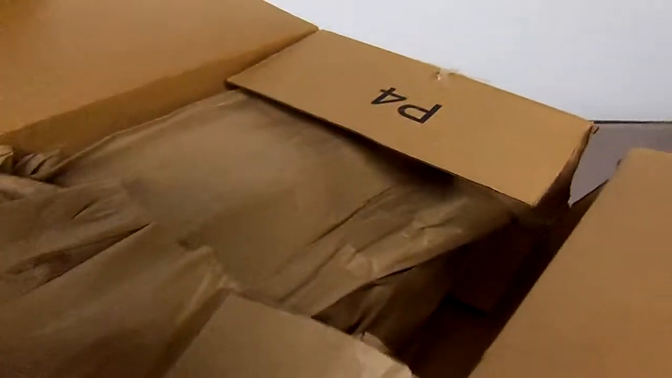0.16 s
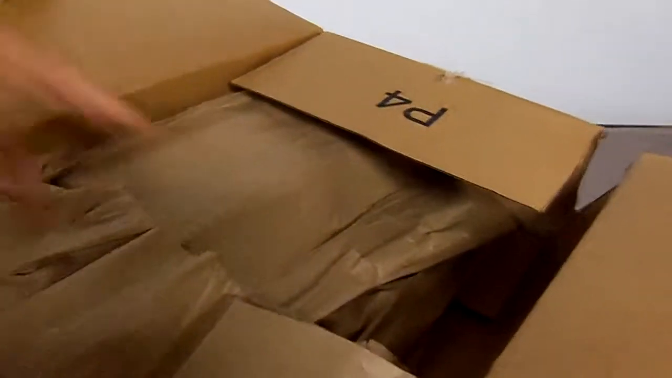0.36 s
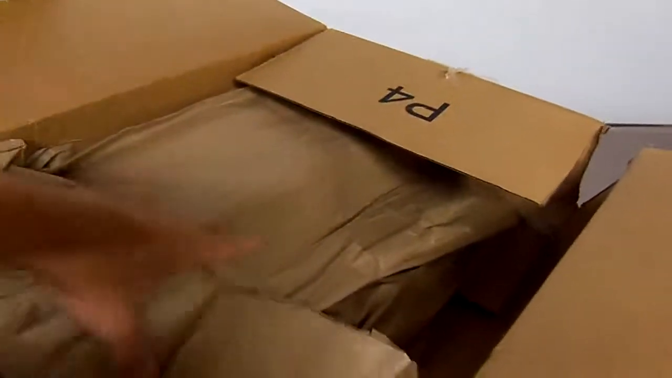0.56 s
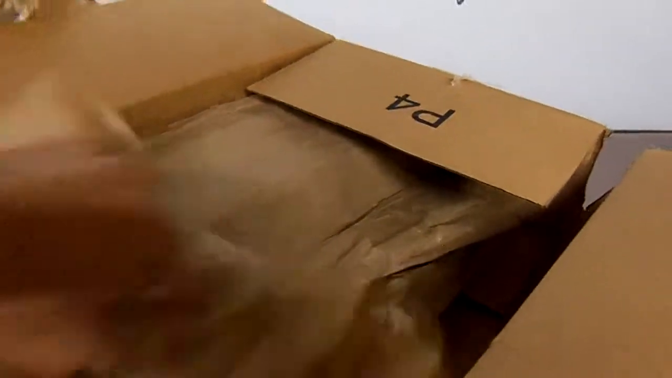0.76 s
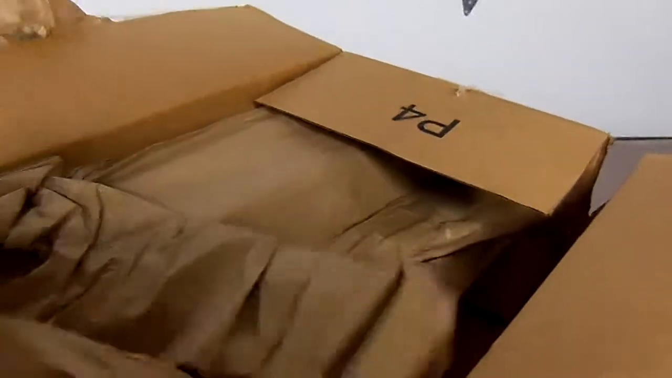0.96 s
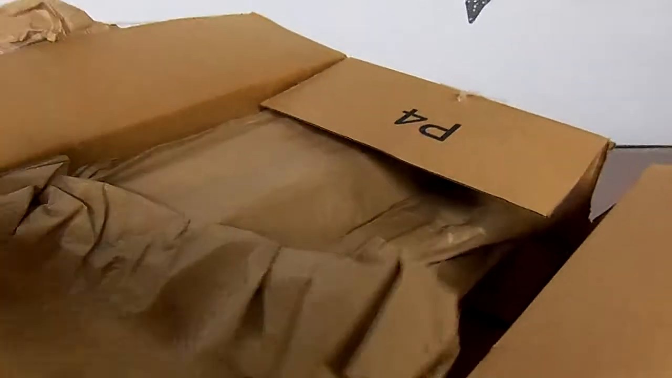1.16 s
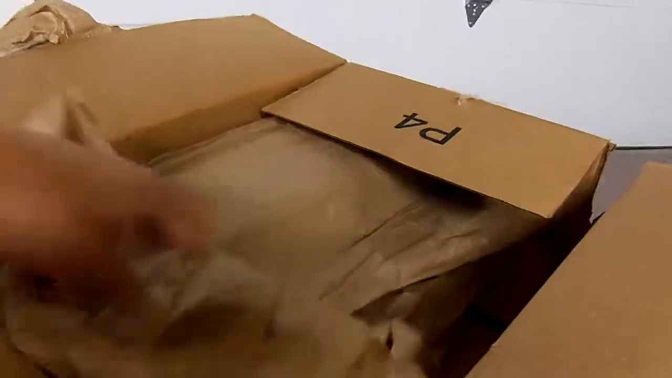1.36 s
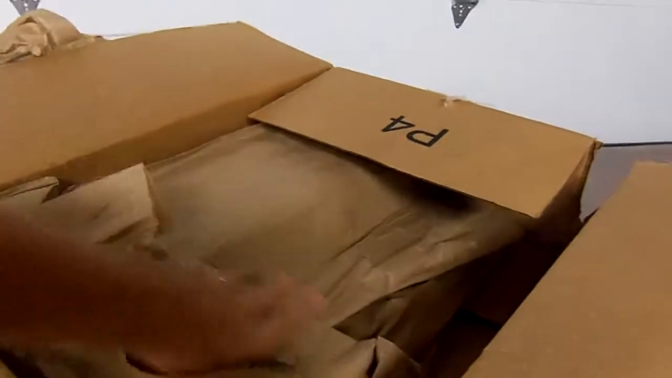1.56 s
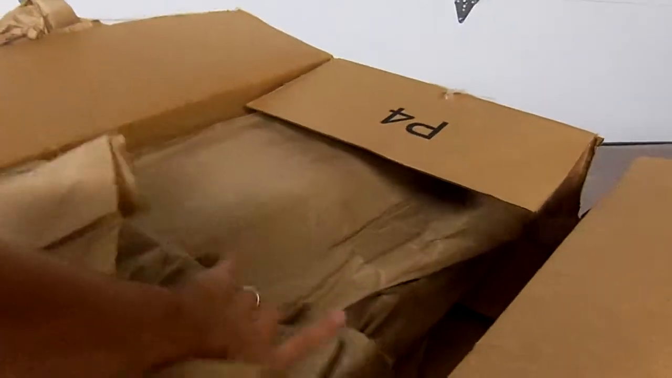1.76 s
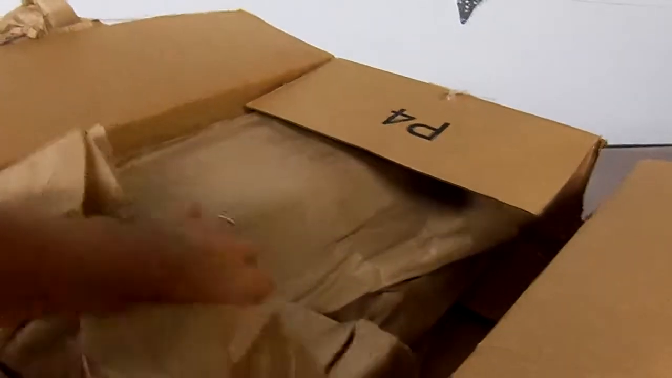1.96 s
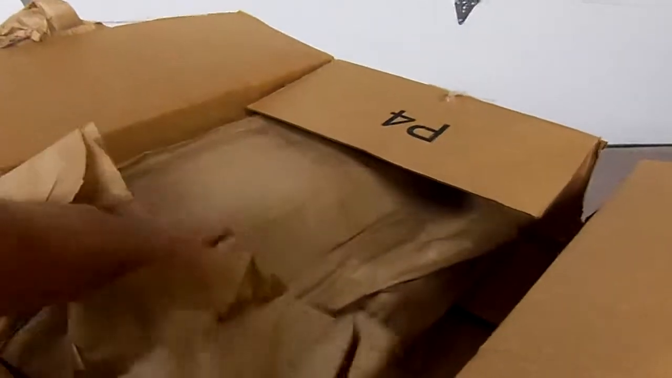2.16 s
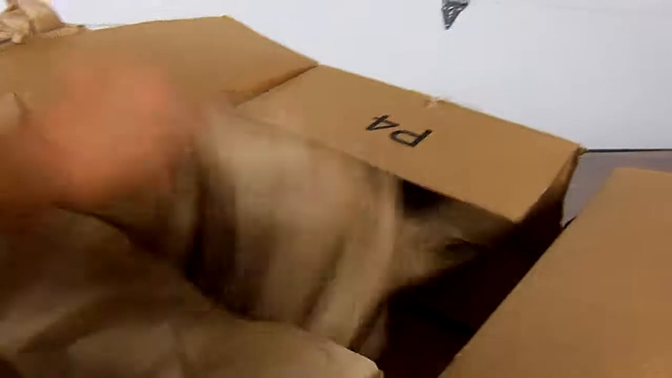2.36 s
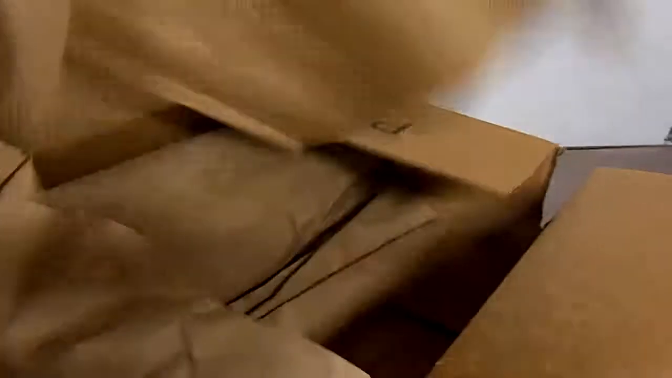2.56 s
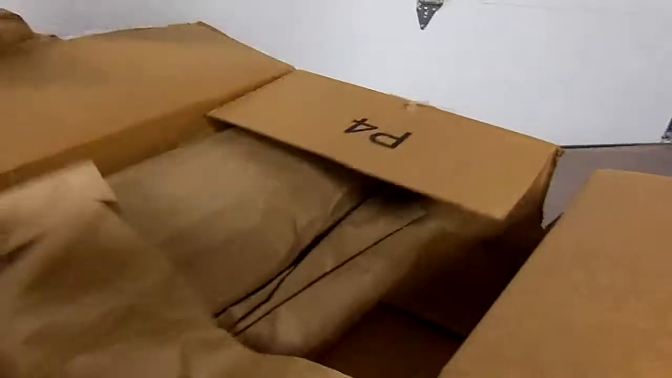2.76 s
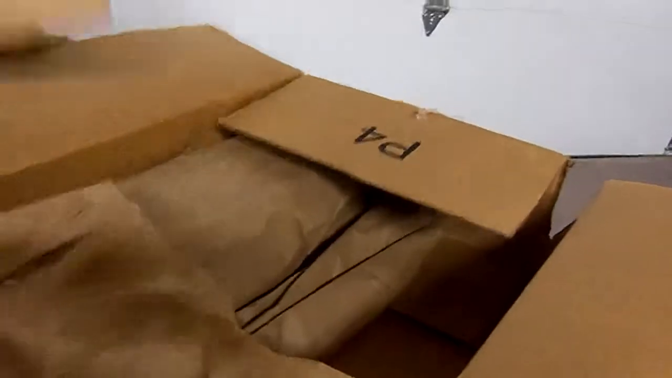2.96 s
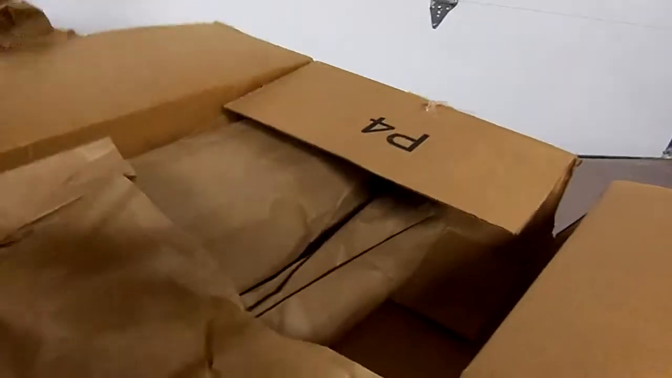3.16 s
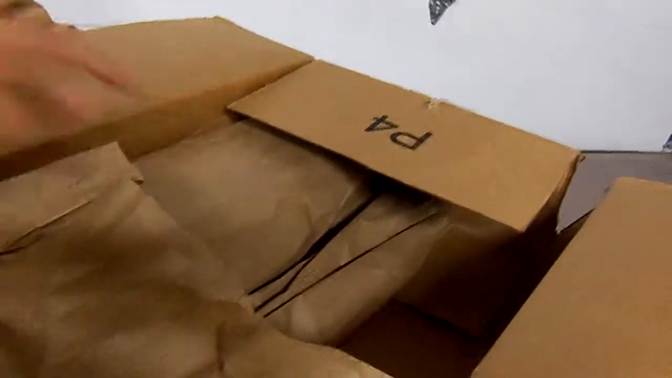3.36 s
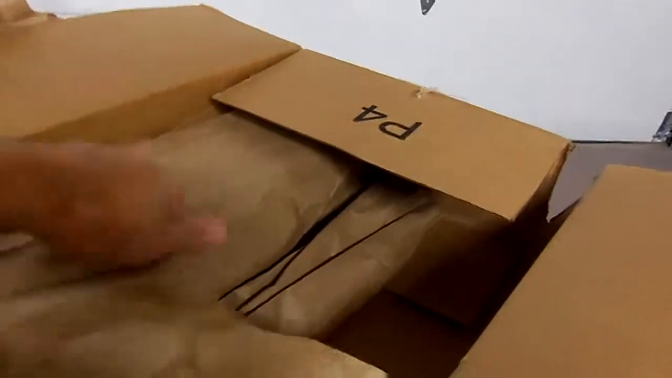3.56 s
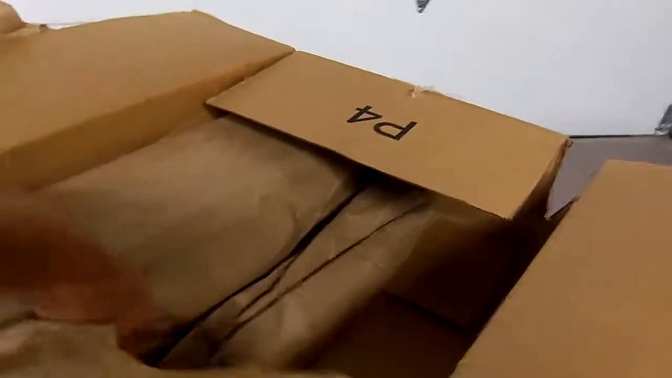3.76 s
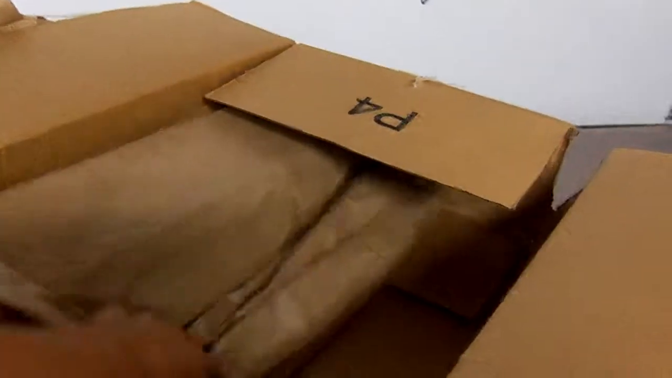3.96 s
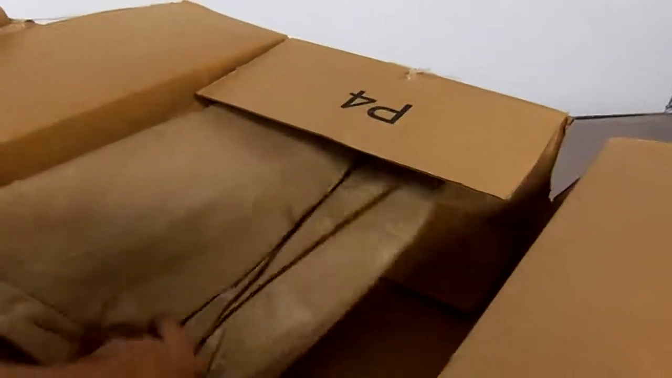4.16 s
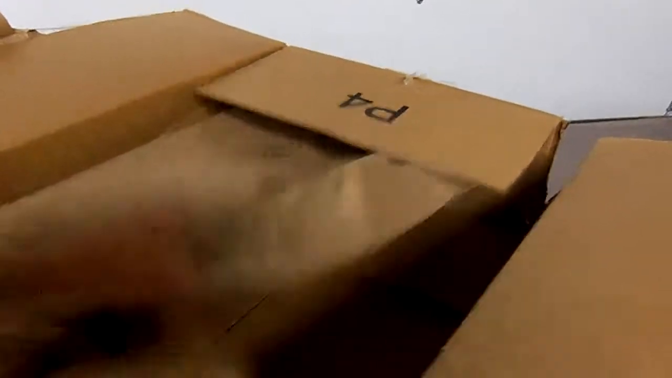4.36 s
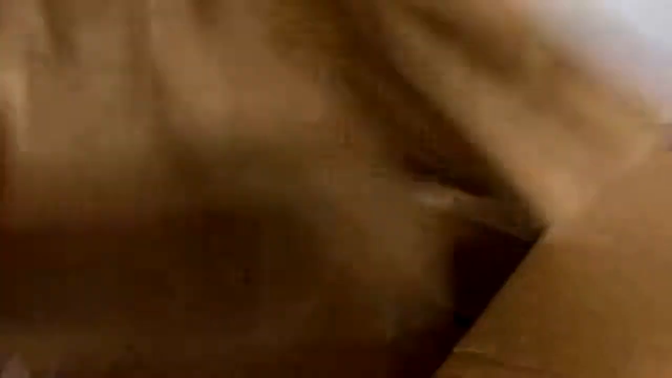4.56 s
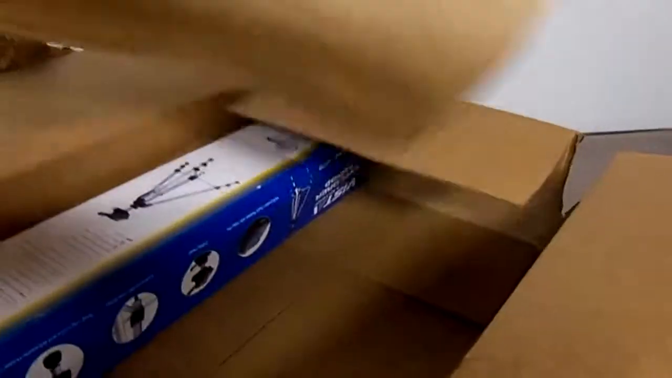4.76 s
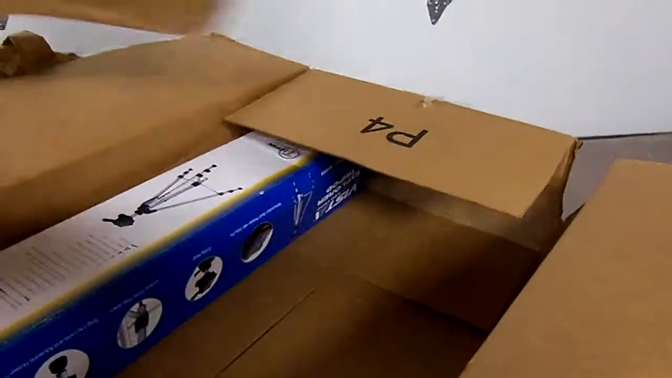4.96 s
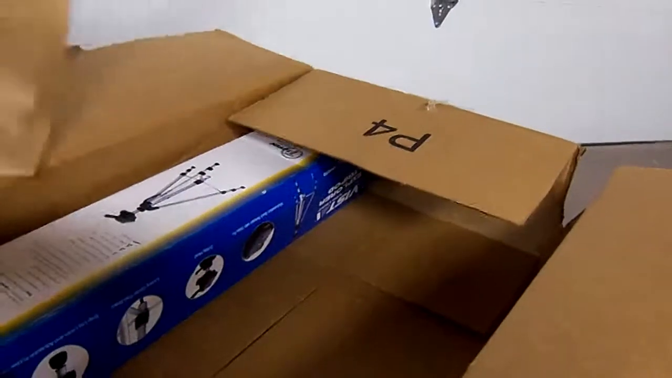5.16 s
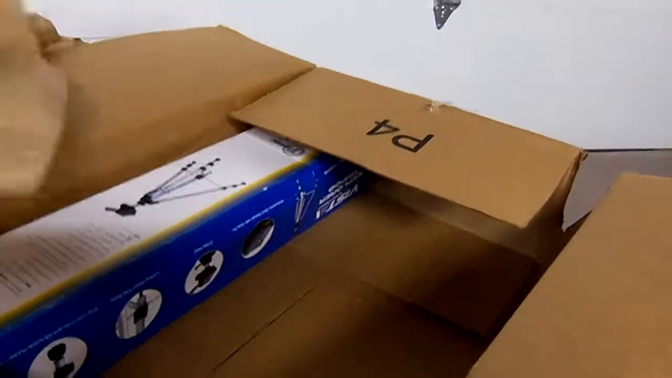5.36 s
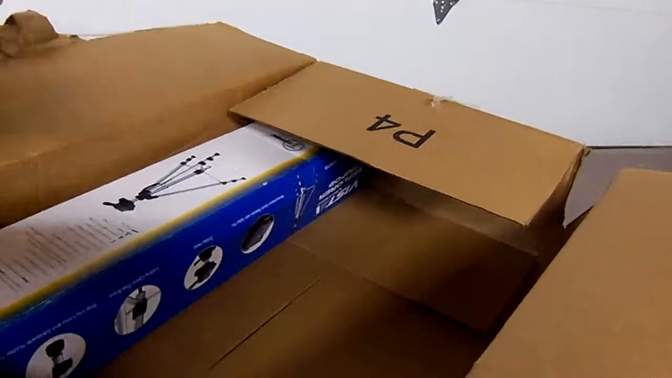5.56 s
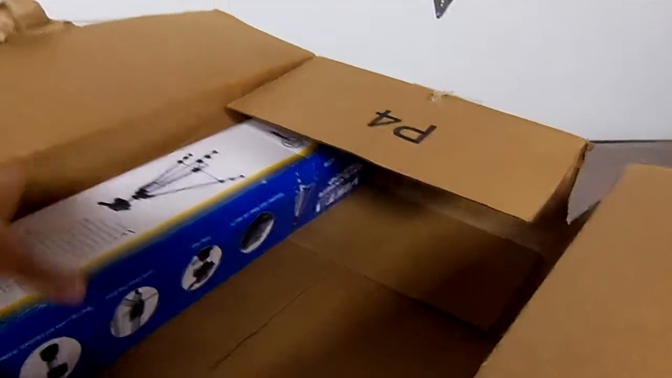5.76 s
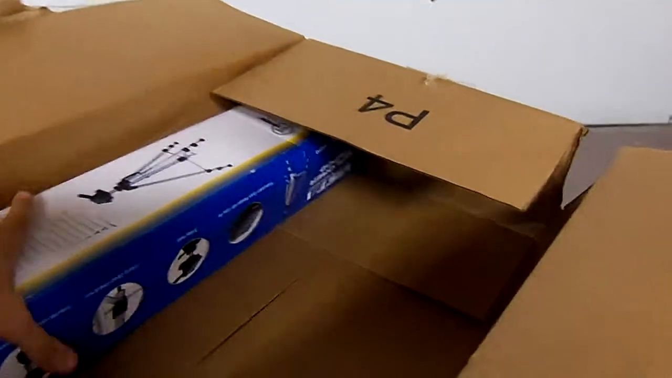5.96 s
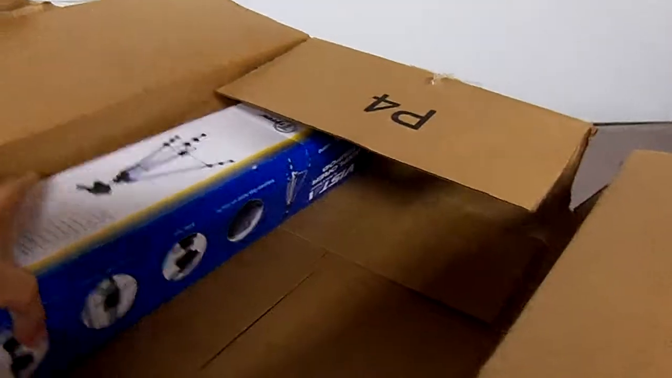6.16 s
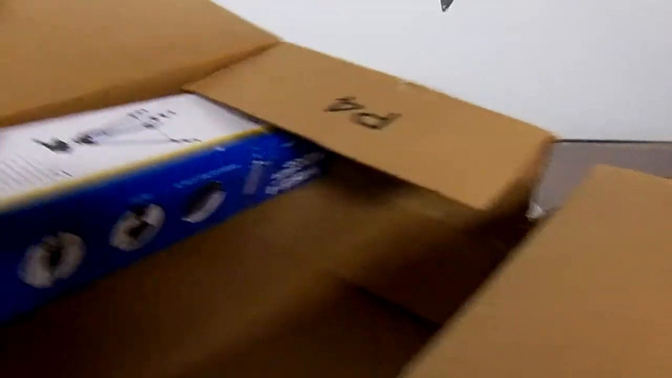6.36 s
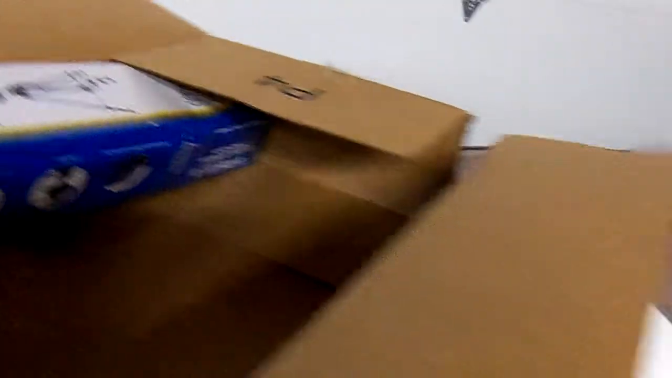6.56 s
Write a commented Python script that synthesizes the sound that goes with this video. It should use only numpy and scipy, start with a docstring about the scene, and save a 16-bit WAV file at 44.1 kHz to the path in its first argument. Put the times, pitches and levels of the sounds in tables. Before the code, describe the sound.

Close to the microphone in a garage, hands shove stiff brown paper about in a large cardboard box. Dense crinkles, sharp crease snaps and low flexing come in uneven bursts, loudest just after half a second and again around two and a half. Sheets are pulled out around four and a half seconds, small rustles thin away, then a carton scrapes, knocks the box sharply and drags.

```python
"""Packing paper in a box

Close to one microphone in a garage, hands push crumpled brown paper aside in a cardboard box.
Shoves drive noise and tiny grains of rub and crinkle; creases snap as short bursts of modes, swung sheets puff.
Bumps ring the hollow box; at the end a gripped carton knocks the wall and drags as stick-slip noise.
The garage answers with a decaying noise tail over a faint bed of air."""
import sys
import numpy as np
from scipy import signal
from scipy.fft import rfft, irfft
from scipy.io import wavfile

SR = 44100
rng = np.random.default_rng(int(sys.argv[2]) if len(sys.argv) > 2 else 0)


def master_out(mix):
    """Clip the mix to full scale and print it as 16-bit PCM to the path in sys.argv[1]."""
    frames = np.transpose(np.atleast_2d(mix))
    ceiling = np.clip(frames, -1, 1)
    pcm = np.round(ceiling * 32767).astype(np.int16)
    wavfile.write(sys.argv[1], SR, pcm)


N = 291721  # length in samples, about 6.6 s

# Colour of a crease giving way, large or small: frequency_hz, relative_density_db
CREASE_COLOUR = [(200, -16), (700, -1), (1500, -2), (2800, 2.5), (4400, -3), (5600, 1), (10000, -1),
                 (14000, -1)]


def rustle(rustle_db, flex_db, crispness):
    """Sheets rub and crinkle while whole sheets flex; the harder the push, the thicker the crinkles come."""
    # colour of paper rubbing: frequency_hz, relative_density_db
    rub_colour = [(500, -16), (1000, -2.5), (1800, -5), (2900, 2), (4500, -2.5), (6000, -4), (10000, -5),
                  (14000, -8.5)]
    # colour of whole sheets flexing: frequency_hz, relative_density_db
    flex_colour = [(30, -13.5), (80, -9.5), (130, -4.5), (200, -3.5), (270, -0.5), (390, -1.5), (520, -6),
                   (760, -1.5), (1000, -2.5), (1500, -3), (2500, -10), (5000, -55.5)]
    crinkles_per_s = 650 * from_db(0.7 * (rustle_db + 39.0))
    crinkle = grains(crinkles_per_s, spread_db=4.0, t60_s=0.048)
    rub = rng.standard_normal(N) * from_db(1.8 * drift(150))
    surface = coloured(rms_one(crinkle + from_db(1.5) * rub), rub_colour)
    surface = crisped(surface, crispness)
    flex_noise = rng.standard_normal(N) * from_db(2.5 * drift(110))
    flex = coloured(rms_one(flex_noise), flex_colour)
    return from_db(rustle_db - 1.16) * surface + from_db(flex_db - 1.7) * flex


def settling(t):
    """Gain t seconds after the hand stops: rustle dies fast, then the crumpled sheets settle slowly."""
    release_db = -145.5 * t
    settle_db = -10 - 35 * t
    return np.maximum(from_db(release_db), from_db(settle_db))


def ticks(rustle_db, count=600):
    """Lesser creases give way at random, each with its own size and pitch; they stand out in gentle movement."""
    ticks_per_s, median_hz, pitch_scatter_octaves = 60, 3473, 0.52
    base_db, size_scatter_db = -43, 3
    follow = 0.83  # share of the rustle's swing in dB that tick level follows
    out = np.zeros(N)
    level_db = base_db + follow * (rustle_db - np.median(rustle_db))
    chances = rng.random((count, 2))
    scatter = np.clip(rng.standard_normal((count, 2)), -2, 2)
    for (when, chance), (size, pitch) in zip(chances, scatter):
        hz = median_hz * 2 ** (pitch_scatter_octaves * pitch)
        tick = burst(hz, t60_s=0.017, rise_s=0.00049, breadth=0.28)
        if chance < ticks_per_s * N / SR / count:
            tick_db = level_db[int(when * N)] + size_scatter_db * size
            add(out, when * N / SR, from_db(tick_db) * tick)
    return coloured(out, CREASE_COLOUR)


def snaps():
    """A crease creaks, flips within milliseconds, and the sheet flutters briefly after it."""
    # loudest creases snapping through: start_s, relative_level_db, ring_t60_s
    snap_times = [(0.2229, -32, 0.0074), (0.5636, -26, .019), (0.5802, -12.5, 0.0062),
                  (0.5885, -15.5, 0.0071), (0.5949, -19.5, 0.075), (0.6452, -25, 0.027),
                  (0.7077, -25, 0.019), (0.7661, -19, .022), (0.7893, -25, .022), (0.8397, -24, 0.022),
                  (0.868, -21.5, 0.0085), (0.888, -22.5, 0.015), (0.9, -14, 0.031), (0.9172, -17.5, 0.015),
                  (1.0256, -18.5, 0.0155), (1.051, -30, 0.02), (1.0922, -32.5, 0.021), (1.1605, -23, 0.004),
                  (1.248, -32, 0.0094), (1.2898, -27, 0.0116), (1.466, -28.5, 0.014), (1.4887, -31, 0.0224),
                  (1.5133, -35, .015), (1.6185, -30, 0.052), (1.7174, -28, .014), (1.769, -26, 0.0097),
                  (1.9361, -38, 0.037), (2.067, -41, .01), (2.0763, -33, 0.016), (2.087, -37.5, 0.0094),
                  (2.1892, -22.5, 0.012), (2.277, -32, 0.029), (2.357, -26, 0.022), (2.4245, -15.5, 0.0059),
                  (2.467, -23.5, .025), (2.504, -22.5, 0.013), (2.792, -36.5, .025), (2.9648, -31, .01),
                  (3.079, -34.5, .012), (3.6284, -32, .031), (3.7319, -28, 0.0106), (3.762, -24, 0.012),
                  (3.8462, -28.5, 0.018), (3.8736, -30, 0.022), (3.9057, -29.5, 0.0078),
                  (4.0142, -27, .015), (4.082, -26, .036), (4.524, -26.5, 0.14), (4.6021, -27, 0.012),
                  (4.6522, -36, 0.015), (4.816, -38.5, 0.02), (5.116, -36, .016), (5.3643, -26, 0.0223)]
    median_hz, scatter_octaves = 6600, 0.093
    creak_lead_s, creak_db = 0.004, -19.5
    out = np.zeros(N)
    for start_s, level_db, t60_s in snap_times:
        hz = median_hz * 2 ** (scatter_octaves * rng.standard_normal())
        crack = burst(hz, t60_s, rise_s=0.000109, breadth=0.69)
        flutter = burst(hz, t60_s=0.049, rise_s=0.0014, breadth=0.58)
        creak = burst(hz, t60_s=0.0336, rise_s=0.00464, breadth=0.54)
        add(out, start_s - creak_lead_s, from_db(level_db + creak_db) * creak)
        add(out, start_s, from_db(level_db + 1) * (crack + from_db(-29) * flutter))
    return coloured(out, CREASE_COLOUR)


def billows():
    """A swung sheet pushes a soft, low puff of air: narrow noise under a smooth swell."""
    # big sheets puffing air: centre_s, level_db at the swell's peak, nominal_pitch_hz (sounds 3 % higher)
    puffs = [(2.46, -50.5, 127.8), (2.56, -45, 123), (3.01, -57, 124.2), (4.36, -51, 115),
             (4.43, -55, 124.4)]
    t = np.arange(N) / SR
    out = np.zeros(N)
    for centre_s, level_db, hz in puffs:
        swell = np.exp(-((t - centre_s) / 0.02) ** 2)
        puff = butter(rng.standard_normal(N), [1.026 * hz, 1.032 * hz], "band") * swell
        out += from_db(level_db) * rms_one(puff) * np.sqrt(np.mean(swell ** 2))
    return out


def bumps():
    """Each bump is a crunchy push around one pitch that rings the box; higher-pitched contacts crack more."""
    # contacts with the box: start_s, relative_level_db, contact_pitch_hz, crunch_t60_s
    contacts = [(0.583, -43, 1500, .034), (0.778, -35, 293, 0.023), (0.842, -35, 1412, .019),
                (1.025, -35.5, 360, 0.04), (1.821, -40, 1020, 0.034), (2.151, -41.5, 1200, .036),
                (2.19, -43.5, 870, 0.22), (2.305, -41, 950, 0.032), (2.919, -49, 1540, .025),
                (3.418, -49.5, 770, 0.019), (5.833, -35.5, 199, 0.085), (5.841, -32, 370, 0.087),
                (5.848, -36.5, 1110, 0.071), (5.858, -34.5, 288, 0.085), (6.3104, -22.5, 3080, 0.043),
                (6.312, -34.5, 750, .073), (6.314, -48, 370, .08), (6.316, -20.5, 2514, 0.037),
                (6.329, -23, 2850, 0.022), (6.524, -35, 750, 0.073), (6.528, -35, 74, 0.11)]
    push = np.zeros(N)
    for start_s, level_db, hz, t60_s in contacts:
        crunch = burst(hz, t60_s, rise_s=0.00038, breadth=0.3)
        knock = butter(crunch, [0.62 * hz, 1.27 * hz], "band")
        crack = hz / 3500 * burst(hz, t60_s, rise_s=0.00017, breadth=0.71)
        add(push, start_s, from_db(level_db) * (from_db(2.0) * knock + crack))
    return from_db(1.0) * push + from_db(-0.5) * box(push)


def slide():
    """Cardboard catches and slips on cardboard in grains and noise; the panels drum under it."""
    # tugs on the carton: start_s, rise_s, hold_s, relative_friction_db, drumming_db relative to friction,
    # crispness (5.1 dB of treble gain per unit)
    tugs = [(5.605, .08, 0.065, -41, -10, -2), (5.71, 0.136, 0.012, -33.5, -9.5, -2),
            (6.04, 0.037, 0.078, -35, -6.5, -3.5), (6.25, 0.0443, 0.024, -36, -10, 0),
            (6.31, .075, 0.014, -30.5, -5.5, -1), (6.41, 0.078, 0.042, -31.5, -4, -0.5)]
    # colour of the scrape: frequency_hz, relative_density_db
    scrape_colour = [(300, -16), (520, -9.5), (720, -2.5), (1000, -6.5), (1600, -2), (2200, -2.5),
                     (2750, 0.5), (3400, -2), (4200, -2), (7000, -1), (10000, -1), (14000, -2.5)]
    # colour of the drumming panels: frequency_hz, relative_density_db
    panel_colour = [(30, -14), (70, -5), (120, -6.5), (190, -2), (280, 3), (380, 2.5), (520, -5.5),
                    (1000, -21), (3000, -35)]

    # the carton coasts to rest after each tug, at 42 dB per second
    friction_db, panel_db, crispness = strokes(tugs, lambda t: from_db(-42 * t))
    catches = grains(np.full(N, 3000.), spread_db=2.5, t60_s=0.012)
    slips = rms_one(catches + from_db(4.5) * rng.standard_normal(N))
    scrape = crisped(coloured(slips, scrape_colour), crispness)
    # a dragged edge chirps on and off at one stiff resonance
    edge = butter(rng.standard_normal(N), [2600, 2950], "band")
    chirp = rms_one(edge * from_db(4.5 * drift(54)))
    # after the knock the carton bears on the wall: the box sings along
    bearing = np.interp(np.arange(N) / SR, [6.29, 6.32], [0.25, 1])
    scrape = scrape + bearing * (from_db(-5) * box(scrape) + from_db(-20) * chirp)
    drumming = coloured(rng.standard_normal(N), panel_colour)
    return from_db(friction_db + 1.7) * scrape + from_db(panel_db - 5.9) * drumming


def box(push):
    """The box's walls and the air between them ring at a few pitches, as parallel resonators."""
    # modes of the box: frequency_hz, relative_level_db, t60_s
    box_modes = [(70, -21.5, 0.13), (186, 8, 0.27), (278, -15, 0.1), (389.5, 2.5, 0.15), (678, 1, .08),
                 (804, 0, 0.025), (980, 2.5, 0.011), (1340, -5, 0.039), (1900, -4, 0.058),
                 (2400, -4.5, 0.029), (2740, -16, 0.043), (3213, -4, 0.0345)]
    rings = 0
    for hz, level_db, t60_s in box_modes:
        radius = from_db(-60 / (t60_s * SR))
        angle = 2 * np.pi * hz / SR
        feed = [1 - radius ** 2, 0, radius ** 2 - 1]
        feedback = [1, -2 * radius * np.cos(angle), radius ** 2]
        rings = rings + from_db(level_db) * signal.lfilter(feed, feedback, push + 1e-18)
    return rings


def garage(x):
    """Dense reflections from 4 ms onwards die away, duller than the direct sound."""
    t60_s = 0.87  # the tail is cut off at half a second
    t = np.arange(SR // 2) / SR
    tail = rng.standard_normal(len(t)) * from_db(-60 * t / t60_s) * (t > 0.004)
    tail = butter(tail / np.sqrt(np.sum(tail ** 2)), 4500, "low", order=1)
    return signal.fftconvolve(x, tail)[:N]


def air():
    """A steady bed of air noise, strongest in the bass."""
    # colour of the air: frequency_hz, relative_density_db
    air_colour = [(15, -29), (25, 8), (122, 0.5), (208, 0.5), (649, -1), (991, -5.5), (1820, -4),
                  (3180, -8), (9920, -9), (14000, -53)]
    return from_db(-60) * coloured(rng.standard_normal(N), air_colour)


def strokes(rows, dying):
    """Each stroke rises, holds and dies away; powers add. Gives surface dB, body dB and mean crispness."""
    rise_curve = 0.92  # above 1, a stroke would gather speed gently
    t = np.arange(0, N, 40) / SR
    surface, body, crisp = 1e-12, 1e-12, 0
    for start_s, rise_s, hold_s, level_db, body_db, crispness in rows:
        rising = np.clip((t - start_s) / max(rise_s, 0.005), 0, 1) ** rise_curve
        since_end_s = np.maximum(t - start_s - rise_s - hold_s, 0)
        power = (from_db(level_db) * rising * dying(since_end_s)) ** 2
        surface = surface + power
        body = body + power * from_db(body_db) ** 2
        crisp = crisp + power * crispness
    return in_time(np.transpose([t, 10 * np.log10(surface), 10 * np.log10(body), crisp / surface]))


def grains(per_s, spread_db, t60_s, count=7):
    """Tiny buckles of uneven size excite bands near their own pitch and die quickly. Rms 1 at any rate."""
    born = rng.random(N) < per_s / SR
    size_db = spread_db * np.minimum(rng.exponential(1, N), 4)
    energy = born * from_db(size_db) ** 2 / per_s
    pitch = rng.uniform(0, count, N)  # in bands
    edges_hz = np.geomspace(900, 15000, count + 1)
    decay = from_db(-120 / (t60_s * SR))  # of energy, hence twice 60
    out = 0
    for k in range(count):
        share = np.exp(-((pitch - k - 0.5) / 2.6) ** 2)
        ringing = signal.lfilter([1], [1, -decay], energy * share + 1e-18)
        band = butter(rng.standard_normal(N), edges_hz[k:k + 2], "band")
        out = out + band * rms_one(np.sqrt(ringing))
    return rms_one(out)


def burst(hz, t60_s, rise_s, breadth):
    """A patch lets go: countless short modes, as noise around its own pitch plus a share over all pitches."""
    t = np.arange(SR // 12) / SR
    own, wide = rng.standard_normal((2, len(t)))
    shape = (1 - np.exp(-(t / rise_s) ** 2)) * from_db(-60 * t / max(t60_s, 0.002))
    modes = rms_one(butter(own, [0.52 * hz, 2.53 * hz], "band", order=1)) + breadth * wide
    return rms_one(modes * shape) * np.sqrt(np.mean(shape ** 2)) / shape.max()


def crisped(x, crispness):
    """Taut, fast-moving paper is brighter than slack paper; the gain is offset to keep power about even."""
    dull = butter(x, 5600, "low", order=1)
    bright = from_db(5.1 * crispness)
    return (dull + (x - dull) * bright) / np.sqrt(0.5 + 0.5 * bright ** 2)


def coloured(x, spectrum):
    """Minimum-phase filter of unit power gain: nothing sounds before its cause."""
    size = 4096
    hz, db = np.transpose(spectrum)
    bins_hz = np.arange(size // 2 + 1) * SR / size
    gain = rms_one(from_db(np.interp(np.log(bins_hz + 1), np.log(hz), db)))
    # folding the cepstrum makes the filter causal
    cepstrum = irfft(np.log(gain))
    cepstrum[1:size // 2] *= 2
    cepstrum[size // 2 + 1:] = 0
    return signal.fftconvolve(x, irfft(np.exp(rfft(cepstrum))))[:N]


def butter(x, hz, kind, order=2):
    """Causal high-, low- or band-pass."""
    sections = signal.butter(order, np.clip(hz, 10, 0.45 * SR), kind, fs=SR, output="sos")
    return signal.sosfilt(sections, x)


def drift(knots_per_s):
    """Slow chance with a spread of 1: straight lines between random knots."""
    knots = rng.standard_normal(4000)
    return rms_one(np.interp(np.arange(N) / SR * knots_per_s, np.arange(len(knots)), knots))


def in_time(rows):
    """Each column of a curve, at every sample."""
    s, *columns = np.transpose(rows)
    return [np.interp(np.arange(N) / SR, s, column) for column in columns]


def add(out, s, sound):
    """Mix a short sound in at time s."""
    at = round(s * SR)
    out[at:at + len(sound)] += sound[:N - at]


def rms_one(x):
    """Scale to unit power."""
    return x / np.sqrt(np.mean(x ** 2) + 1e-20)


def from_db(db):
    """Decibels to gain."""
    return 10 ** (np.asarray(db) / 20)


def scene():
    """Everything is close to one microphone, so both channels are alike."""
    # paper pushed, lifted or sagging back: start_s, rise_s, hold_s, relative_rustle_db,
    # flexing_db of whole sheets relative to the rustle, crispness (5.1 dB of treble gain per unit)
    shoves = [(-0.03, 0.022, 0.081, -37.5, -5.5, 0.5), (0.31, 0.038, 0.1, -58, -3, -1),
              (0.515, 0.037, 0.026, -42, -6, 1), (0.56, 0.013, 0.058, -28.5, -7.5, 1),
              (0.67, 0.044, 0.11, -33.5, -7.5, 4), (0.88, 0.0152, 0.11, -40.5, -8, 0.5),
              (1.19, 0.015, 0.21, -44.5, -11.5, 1), (1.48, 0.0166, 0.12, -47.5, -9.5, 11),
              (1.6, 0.23, 0.046, -36.5, -6, 1), (1.98, 0.045, .04, -47, -6, 4.5),
              (2.12, 0.039, 0.15, -35, -6.5, 0.5), (2.31, 0.099, 0.15, -31.5, -10, 0.35),
              (2.73, 0.0445, 0.098, -47.5, -9.5, -0.5), (2.95, 0.02, 0.033, -42.5, -10, 1),
              (3.06, 0.023, 0.15, -50.5, -5, -0.5), (3.27, 0.023, .025, -58, -4.5, -8),
              (3.42, 0.016, 0.061, -60.5, -10, 4.5), (3.555, 0.069, 0.06, -42, -2.5, .5),
              (3.7, 0.06, 0.18, -46.5, -8.5, 2.5), (3.92, 0.022, 0.146, -42, -8, 0.5),
              (4.14, 0.041, 0.042, -34.5, -8, 1), (4.25, 0.055, 0.16, -36, -11, 1),
              (4.37, 0.0966, 0.145, -35.5, -9, 0), (4.66, 0.017, .012, -44, -9, -1.5),
              (4.79, 0.0078, 0.0095, -46.5, -2, -2), (4.92, 0.011, 0.17, -50, -6.5, -0.5),
              (5.105, 0.0195, 0.046, -41, -10.5, 0.5), (5.22, 0.012, 0.126, -47.5, -7.5, 0.5),
              (5.4, 0.036, .04, -49, -9, -1)]
    rustle_db, flex_db, crispness = strokes(shoves, settling)
    paper = rustle(rustle_db, flex_db, crispness) + ticks(rustle_db) + snaps() + billows()
    near = paper + bumps() + slide()
    mono = near + from_db(-10) * garage(near) + air()
    return np.array([mono, mono])


def record(dry):
    """The top is cut steeply above 14.1 kHz."""
    steep_cut = signal.ellip(10, 0.2, 75, 14100, fs=SR, output="sos")
    return signal.sosfilt(steep_cut, dry)


dry = scene()
out = record(dry)
master_out(out)
```